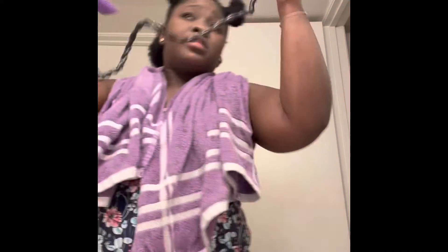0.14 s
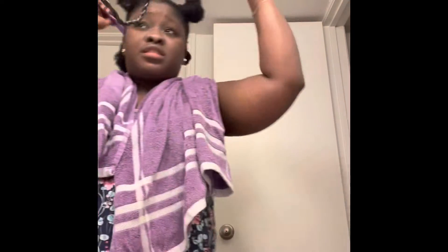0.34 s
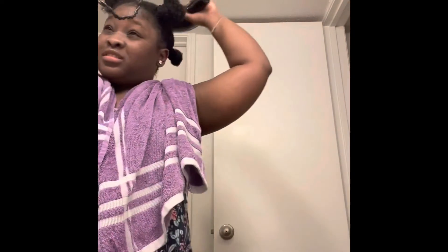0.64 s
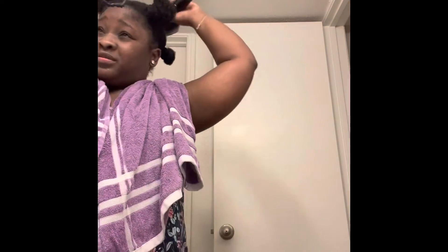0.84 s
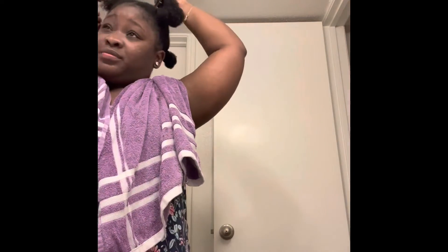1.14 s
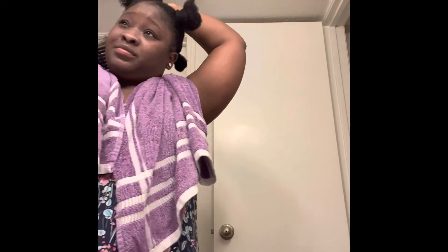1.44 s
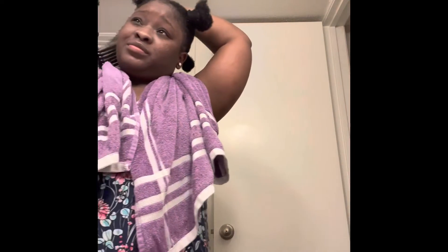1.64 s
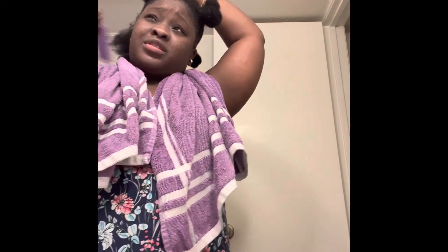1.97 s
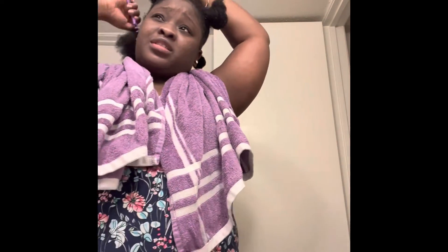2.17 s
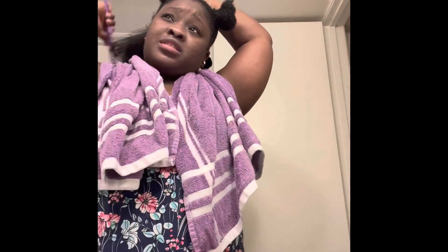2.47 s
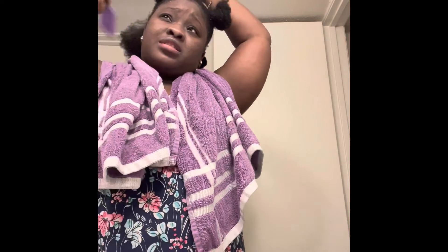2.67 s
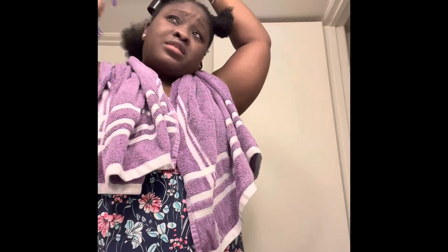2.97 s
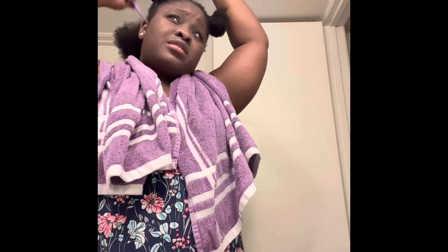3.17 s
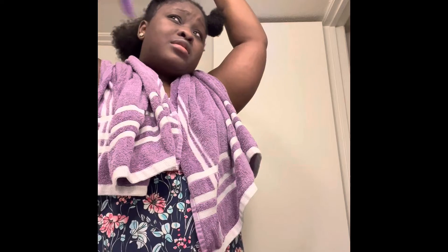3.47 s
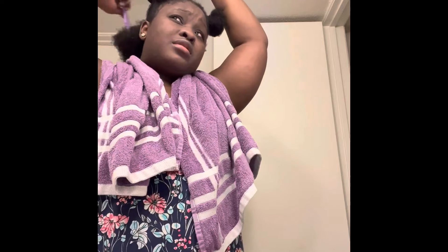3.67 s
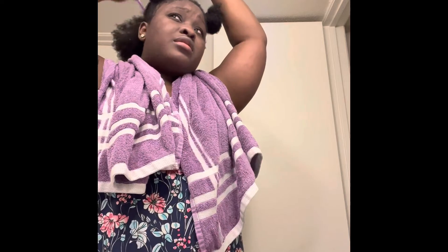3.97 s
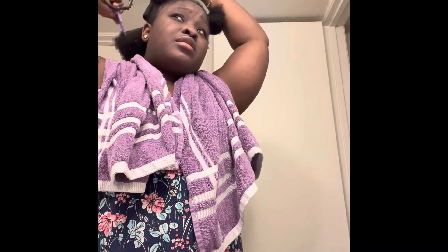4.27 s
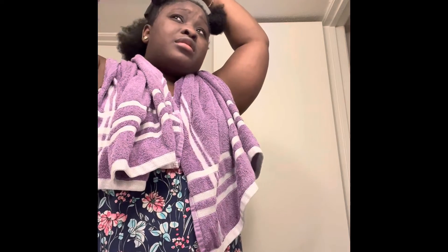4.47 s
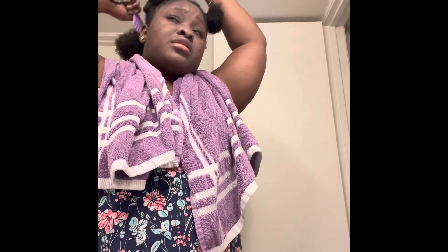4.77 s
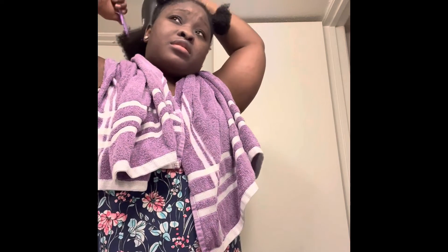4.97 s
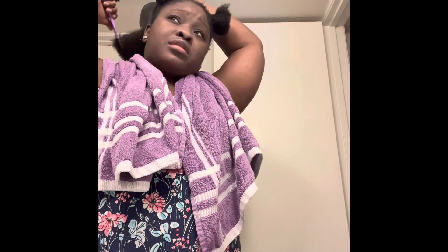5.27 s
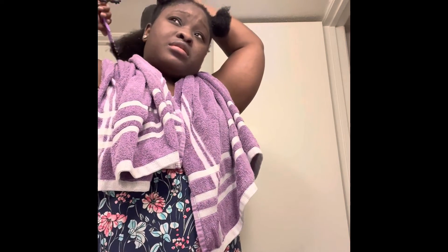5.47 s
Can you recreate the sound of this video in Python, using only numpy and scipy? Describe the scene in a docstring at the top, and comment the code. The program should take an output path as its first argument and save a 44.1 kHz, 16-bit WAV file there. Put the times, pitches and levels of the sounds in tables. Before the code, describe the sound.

Steady noise of a hair dryer indoors, heard close in stereo: broad mid-range rush, softer hiss of air on hair, faint low rumble and motor hum. A whistling whine near 1200 hertz with a higher overtone rides on top, strong at first, returning around one and a half seconds, thinnest near three, then flickering until the end. No switching on or off.

```python
"""A hand-held hair dryer in a small bathroom, heard for 5.6 s by a close two-port microphone.
It opens on a loud blade whine, and in the first second a ring of the shell slides up and back down.
The fan's rush, the housing and the nozzle's hiss on hair, all shaped noise, run on over rumble and motor hum.
The whine, sines on multiples of the shaft speed, swells and drops out in the room's standing waves; the blade
tone dips near 3 s, the low-mid roar lifts briefly at 4.3 s, and a lower duct ring stands out near 4.9 s."""
import sys
import numpy as np
from scipy import signal
from scipy.fft import rfft, irfft, next_fast_len
from scipy.io import wavfile
from scipy.ndimage import uniform_filter1d, map_coordinates

SR = 44100
rng = np.random.default_rng(int(sys.argv[2]) if len(sys.argv) > 2 else 0)


def output_pcm(signal):
    """Save a mono or channel-first signal as 16-bit PCM at the path in sys.argv[1].

    Samples are clipped to [-1, 1] before scaling.
    """
    pcm = np.clip(np.atleast_2d(signal).T, -1, 1) * 32767
    wavfile.write(sys.argv[1], SR, np.round(pcm).astype(np.int16))


N = 247842

# motor speed under the changing load, before a small random drift: (time [s], turns per second [Hz])
SHAFT_SPEED = [(0, 294.4), (.18, 294), (.4, 295), (.65, 294.8), (.87, 296.1), (1.35, 295.25), (1.85, 295.1),
               (2.5, 295.5), (3.5, 295.15), (4.1, 295.2), (4.7, 294.8), (5.0, 295.85), (5.62, 295.8)]
# air flow as the dryer is aimed, before each layer's trim:
# (time [s], jet level [dB], housing level [dB], nozzle hiss level [dB])
AIR_FLOW = [(0, -34, -31, -33.5), (.22, -37, -29.5, -34.5), (.4, -36.5, -31.5, -36.5),
            (.8, -35.5, -33, -39), (1.05, -34, -33, -38.5), (1.45, -37, -35.5, -39.5),
            (2.0, -35.5, -33, -38.5), (2.25, -37.5, -34.5, -39), (2.5, -35.5, -35.5, -39),
            (2.9, -37, -34, -36.5), (3.35, -37, -32.5, -35.5), (3.7, -37.5, -32.5, -36),
            (4.02, -37, -31, -36.5), (4.2, -36, -36, -37), (4.62, -35, -32.5, -36.5),
            (4.88, -35, -34, -36.5), (5.07, -36, -31.5, -37.5), (5.25, -35, -30.5, -37.5),
            (5.62, -35, -31.5, -37.5)]


def amp(db):
    """Decibels to gain."""
    return 10 ** (np.asarray(db) / 20)


def unit(x):
    """Scale to rms 1."""
    return x / np.sqrt(np.mean(x ** 2) + 1e-20)


def along(points, hz):
    """(Hz, value) points read on a log frequency axis."""
    f, v = np.transpose(points)
    return np.interp(np.log(hz + 1), np.log(f + 1), v)


def curves(rows):
    """One value per sample for each column after the time."""
    s, *columns = np.transpose(rows)
    return [np.interp(np.arange(N) / SR, s, column) for column in columns]


def wobble(rate):
    """A smooth random curve through normal random knots, rate knots a second."""
    knots = rng.standard_normal(int(N * rate / SR) + 4)
    return map_coordinates(knots, [np.arange(N) * rate / SR])


def bump(s, half_width):
    """A bell of height 1 centred on time s, down to 1/e at half_width seconds."""
    return np.exp(-((np.arange(N) / SR - s) / half_width) ** 2)


def left_right(hz):
    """Complex gain of left and right at each frequency, mean power 1 over the pair."""
    # left-right balance by frequency: (frequency [Hz], left over right [dB])
    balance = [(170, 0), (400, .7), (530, 6.5), (670, 0), (800, 7), (920, -.5), (1030, 0), (1400, 6),
               (1600, 6), (1840, 10), (2100, 5), (2600, 2.5), (3500, 2), (5000, 0)]
    # left-right phase of the noise by frequency: (frequency [Hz], left minus right [rad])
    phase = [(170, 0), (500, .2), (700, -.5), (830, -2), (950, .3), (1150, -2.6), (1450, 0), (1750, -1.2),
             (2800, -2.4), (4500, -4.3), (6200, -5.05), (8200, -3.4), (10100, -2.95), (11500, -1.5),
             (12700, 0)]
    half = amp(along(balance, hz) / 2) * np.exp(.5j * along(phase, hz))
    pair = np.array([half, 1 / half])
    return pair / np.sqrt(np.mean(abs(pair) ** 2, axis=0))


def rush(gain):
    """Turbulent air of rms 1, coloured by gain(Hz), with left and right noise partly alike."""
    # likeness of left and right noise by frequency: (frequency [Hz], likeness [0-1])
    likeness = [(130, .998), (300, .95), (550, .85), (820, .55), (950, .6), (1100, .3), (1500, .35),
                (1800, .8), (2400, .87), (3200, .15), (4200, .15), (5900, .7), (8400, .96), (10000, .96),
                (11500, .6), (13000, .93)]
    size = next_fast_len(N + SR // 4)
    hz = np.fft.rfftfreq(size, 1 / SR)
    turn = np.arccos(np.clip(along(likeness, hz), 0, 1)) / 2
    shared, apart = rfft(rng.standard_normal((2, size))) * [np.cos(turn), np.sin(turn)]
    spectra = np.array([shared + apart, shared - apart]) * left_right(hz) * gain(hz)
    return unit(irfft(spectra, size)[:, :N])


def colour(spectrum, modes=()):
    """Gain by frequency of a broad spectrum, with resonances and dips added in dB."""
    def gain(hz):
        lift_db = sum(lift / (1 + (2 * (hz - centre) / width) ** 2) for centre, width, lift in modes)
        return amp(along(spectrum, hz) + lift_db)
    return gain


def resonance(centre, half_width):
    """Gain by frequency of one resonance, halved at half_width Hz from its centre."""
    return lambda hz: 1 / (1 + ((hz - centre) / half_width) ** 2)


def standing_waves(x, depth_db, size=2048):
    """Close walls ripple the spectrum by depth_db rms, and the ripple drifts as the hand moves."""
    z = signal.stft(x, nperseg=size)[2]
    ripple = rng.standard_normal(z.shape[1:])
    ripple = uniform_filter1d(ripple, size=3, axis=0)  # across frequency
    ripple = uniform_filter1d(ripple, size=24, axis=1, mode="wrap")  # along time
    ripple = uniform_filter1d(ripple, size=8, axis=1)
    rippled = signal.istft(z * amp(depth_db * unit(ripple)), nperseg=size)[1]
    return unit(rippled[:, :N])


def crossings(order):
    """Gain in dB of one partial as the dryer crosses its nodes and antinodes."""
    # (time [s], multiple of the shaft speed, half width [s], depth [dB])
    node_dips = [(.168, 4, .03, 7), (.56, 4, 0.039, 6), (.79, 4, .018, 7), (.47, 4, .025, 3),
                 (1.84, 4, .04, 6), (2.72, 4, .035, 8), (3.06, 4, .03, 4), (3.365, 4, 0.048, 13),
                 (3.71, 4, 0.075, 8), (4.16, 4, .047, 9), (4.6, 4, .04, 1), (4.82, 4, .05, 5),
                 (.32, 8, .025, 6.5), (.39, 8, .015, 7), (.46, 8, .017, 10), (.62, 8, .03, 11),
                 (.78, 8, 0.037, 10), (.89, 8, 0.013, 7), (1.04, 8, .035, 13), (2.09, 8, .071, 24.5),
                 (2.67, 8, .025, 10), (4.19, 8, 0.031, 6.5), (4.38, 8, .07, 0), (4.79, 8, .025, 12.5),
                 (4.94, 8, 0.023, 11)]
    # (time [s], multiple of the shaft speed, half width [s], lift [dB])
    antinode_swells = [(4.68, 2, 0.043, 10.5), (.125, 8, 0.015, 9.5), (.245, 8, .025, 7.5),
                       (.53, 8, 0.02, 5), (.71, 8, .025, 3), (.95, 8, 0.039, 7.5), (4.71, 8, .045, 3),
                       (.09, 12, 0.049, 8.5), (.29, 12, 0.037, 11), (.45, 12, .041, 6),
                       (.68, 12, 0.039, 11.5), (1.07, 12, 0.12, 9.5), (1.96, 12, .022, 12.5),
                       (2.69, 12, 0.032, 9), (4.35, 12, 0.14, 5), (4.91, 12, .05, 8)]

    def total_db(rows):
        return sum(db * bump(s, width) for s, multiple, width, db in rows if round(multiple) == order)
    return total_db(antinode_swells) - total_db(node_dips)


def blade_tone(angle, level_db, image, order, flutter_db, jitter):
    """One partial at both ports; uneven inflow shakes its strength (dB) and phase (rad)."""
    pan_db, lead = image
    phase = order * angle + jitter * wobble(35)
    left, right = amp(pan_db / 2), amp(-pan_db / 2)
    pair = np.array([left * np.sin(phase + lead / 2), right * np.sin(phase - lead / 2)])
    pair = 2 * pair / np.hypot(left, right)  # rms 1 over both ports
    return amp(level_db + crossings(order) + flutter_db * wobble(25.03)) * pair


def fading_line(angle, order, fade):
    """A shaft multiple of rms 1: a steady direct part plus drifting wall reflections."""
    walls = np.array([wobble(7) + 1j * wobble(6.3) for _ in range(2)])
    mean_hz = np.mean(SHAFT_SPEED, axis=0)[1]
    paths = left_right(order * mean_hz)[:, None] + fade * walls
    return unit(np.real(paths * np.exp(1j * order * angle)))


def room_rumble():
    """Low noise, coloured by the modes of the small room."""
    # (frequency [Hz], relative level [dB])
    rumble_spectrum = [(12, -40), (25, -16), (40, -13), (70, 0), (95, -4.5), (135, -5.5), (200, -8),
                       (310, -10), (380, -9.5), (480, -7.5), (750, -87)]
    # resonances and dips: (frequency [Hz], width [Hz], lift [dB])
    rumble_modes = [(66.5, 3.6, -4.5), (117.7, 11.5, 9.5), (131, 14, -6), (157.3, 11.8, 9.5),
                    (209, 18, -2.5), (258.9, 15.6, 13), (305, 18, -8), (360, 42, 8), (415, 20, -1)]
    # (time [s], level [dB])
    rumble_levels = [(0, -40.5), (.85, -41), (1.1, -42.5), (2.4, -41.5), (3.0, -43.5), (3.45, -41.5),
                     (4.1, -42.5), (4.7, -43), (4.9, -40.3), (5.35, -40), (5.62, -42)]
    level_db, = curves(rumble_levels)
    return amp(level_db + 0.25 * wobble(3.8)) * rush(colour(rumble_spectrum, rumble_modes))


def motor(angle):
    """Imbalance and commutator lines hum and waver under the rush."""
    # hum at twice the shaft speed, before its flutter: (time [s], level [dB])
    hum_levels = [(0, -48), (.22, -45), (.4, -40.5), (1.3, -47), (1.9, -41), (2.2, -45), (2.9, -43.5),
                  (3.4, -51), (3.7, -46.5), (4.4, -44.5), (5.05, -46), (5.25, -38.5), (5.62, -46)]
    # where the ports hear that hum: (left over right [dB], left lead [rad])
    hum_image = (5.2, 0.11)
    # weak lines, before their waver: (multiple of the shaft speed, level [dB])
    motor_lines = [(1, -57.5), (5, -55.5), (6, -50), (7, -49.5), (16, -54.5), (20, -57)]
    hum_db, = curves(hum_levels)
    total = blade_tone(angle, hum_db, hum_image, order=2, flutter_db=2.0, jitter=0.38)
    for multiple, db in motor_lines:
        total = total + amp(db + 2.5 * wobble(14)) * fading_line(angle, order=multiple, fade=0.35)
    return total


def slid(x, shift_hz):
    """Shift every frequency in x by a changing number of Hz."""
    return np.real(signal.hilbert(x) * np.exp(2j * np.pi * np.cumsum(shift_hz) / SR))


def ringing():
    """Turbulence keeps the duct and the shell ringing as two fluttering half-whistles."""
    # (time [s], level [dB])
    duct_levels = [(0, -42), (.2, -36.5), (.5, -44), (1.4, -47), (2.0, -41.5), (2.6, -43.5), (2.8, -42),
                   (3.1, -43.5), (3.6, -44), (4.78, -46.5), (4.9, -35.5), (5.05, -37), (5.4, -40.5),
                   (5.62, -36.5)]
    # (time [s], level [dB])
    shell_levels = [(0, -28.5), (.09, -30), (.2, -36.5), (.36, -43), (1.0, -47), (1.4, -49.5), (2.1, -39.5),
                    (2.3, -34), (2.55, -36.5), (3.2, -34.5), (4.0, -34), (4.2, -41), (4.7, -37.5),
                    (5.0, -43), (5.62, -44)]
    # both slide as the dryer is raised: (time [s], shell shift [Hz], duct shift [Hz])
    ring_slide = [(0, 55, -72), (.09, 138, -72.5), (.14, 389, -82), (.26, 429, -91), (.75, 1, -90.5),
                  (1.6, -1, -0.5)]
    duct_db, = curves(duct_levels)
    shell_db, = curves(shell_levels)
    shell_shift_hz, duct_shift_hz = curves(ring_slide)
    # centres and half widths in Hz, before the slide
    duct = slid(rush(resonance(centre=922, half_width=28)), duct_shift_hz)
    shell = slid(rush(resonance(centre=1822, half_width=80)), shell_shift_hz)
    return amp(duct_db) * duct + amp(shell_db) * shell


def flares():
    """Short swells in which one band rings out of the rush."""
    # (time [s], half length [s], centre [Hz], half width [Hz], level at the crest [dB])
    band_flares = [(.055, .015, 2010, 70, -32), (0.092, .012, 1890, 80, -24), (.16, .08, 2180, 220, -32),
                   (.18, .08, 820, 12, -38), (0.438, 0.038, 2220, 70, -34), (1.01, 0.03, 1830, 53, -36),
                   (1.097, .15, 728, 16, -39), (1.303, .13, 545, 8, -39.5), (2.674, 0.024, 1830, 70, -32),
                   (2.815, 0.017, 1824, 60, -29), (3.645, .02, 1790, 60, -29), (4.02, .03, 1830, 90, -31),
                   (4.673, 0.019, 1830, 65, -27)]
    total = 0
    for s, half_length, hz, half_width, db in band_flares:
        swell = bump(s, half_length)
        burst = unit(swell * rush(resonance(hz, half_width)))
        total = total + amp(db) * np.sqrt(np.mean(swell ** 2)) * burst
    return total


def housing_rush():
    """The housing rings broadly under the air that runs through it."""
    # (frequency [Hz], relative level [dB])
    housing_spectrum = [(900, -28), (1450, -26), (1650, -2), (1800, -1.5), (2000, 0), (2250, -0.5),
                        (2500, -1.5), (2850, -5.5), (3100, -11.5), (4500, -53)]
    # resonances: (frequency [Hz], width [Hz], lift [dB])
    housing_modes = [(1830, 45, 3.9), (2180, 35, 5.6), (2276, 50, 1.1)]
    _, level_db, _ = curves(AIR_FLOW)
    noise = standing_waves(rush(colour(housing_spectrum, housing_modes)), depth_db=3.5)
    return amp(level_db + 0.4 + 0.27 * wobble(24.84)) * noise


def nozzle_hiss():
    """Fine turbulence hisses where the nozzle blows on hair."""
    # (frequency [Hz], relative level [dB])
    hiss_spectrum = [(1500, -30), (2400, -4), (2750, -1), (3030, -2.8), (3350, 1.8), (3750, -1.3),
                     (4150, -1), (4500, -4.3), (5200, -5.6), (6300, -7), (7500, -11.3), (9500, -13.3),
                     (11000, -15.5), (13000, -20.5), (15500, -24)]
    _, _, level_db = curves(AIR_FLOW)
    noise = standing_waves(rush(colour(hiss_spectrum)), depth_db=2.5)
    return amp(level_db + 2 + 0.48 * wobble(22)) * noise


def jet_roar():
    """The jet's turbulence roars in the low mids; the roar lifts once, briefly."""
    # (frequency [Hz], relative level [dB])
    jet_spectrum = [(200, -50), (340, -18.5), (480, -0.5), (620, 0), (850, 0), (1000, -4), (1100, -3),
                    (1300, -5), (1550, -3.5), (2000, -40), (3000, -69)]
    # resonances: (frequency [Hz], width [Hz], lift [dB])
    jet_modes = [(545, 9.2, 8.8), (660, 22, 1.6), (706, 30, 4.7), (784, 14, 3.3), (804, 15, 7.9),
                 (898, 7.6, 3.3), (991, 18, 5.5), (1203, 16, 3.7)]
    # (time [s], half width [s], lift [dB])
    roar_lift = (4.3, 0.021, 3.2)
    level_db, _, _ = curves(AIR_FLOW)
    lift_s, lift_half_width, lift_db = roar_lift
    level_db = level_db + lift_db * bump(lift_s, lift_half_width)
    noise = standing_waves(rush(colour(jet_spectrum, jet_modes)), depth_db=1.44)
    return amp(level_db + 1.0 + 0.5 * wobble(12)) * noise


def whine(angle):
    """Blades passing four to a turn make a tone and two overtones, each with its own standing waves."""
    # levels before flutter, dips and swells: (time [s], level [dB])
    blade_levels = [(0, -23), (.04, -23.5), (.1, -31), (.25, -26), (.33, -34), (.42, -28), (.55, -32),
                    (.7, -29), (.9, -34), (1.0, -36), (1.25, -36.5), (1.4, -28), (1.68, -27.5), (1.85, -31),
                    (2.12, -35.5), (2.3, -29), (2.6, -32), (2.82, -37), (2.95, -46), (3.2, -37.5),
                    (3.55, -38), (4.0, -35.5), (4.4, -37), (4.75, -37.5), (5.05, -31.7), (5.55, -31.5),
                    (5.62, -34)]
    # (time [s], level [dB])
    octave_levels = [(0, -26.5), (.16, -31.5), (.36, -31), (.85, -34.5), (1.12, -35), (1.25, -30),
                     (1.5, -33.5), (1.72, -29.5), (1.95, -28), (2.25, -31), (2.55, -37), (2.87, -29),
                     (3.5, -29), (4.1, -30.5), (4.2, -35), (4.85, -30.5), (5.0, -32), (5.28, -29),
                     (5.55, -32), (5.62, -37)]
    # where the standing waves put each partial: (time [s], left over right [dB], left lead [rad])
    blade_image = [(0, 9, 3), (.14, -3, 3), (.19, 8, 3.5), (.24, 5, 5.5), (.3, 13, 4.5), (.37, -7.5, 9.5),
                   (.46, -2, 10), (.52, 11, 9.5), (.58, -1, 5), (.77, 7, 3.5), (.83, -4, 5), (1.0, 0, 5),
                   (1.4, -1, 4.1), (1.75, 2, 3.6), (1.81, -1, 3.2), (1.87, 0.5, 4), (1.95, 9, 4),
                   (2.1, 9, 3), (2.4, 18, 1.3), (2.66, 16, 1.8), (2.78, 5, -0.8), (2.97, 9, -1.3),
                   (3.15, -1, 0.5), (4.05, 2.5, 0.55), (4.15, 10, 1.2), (4.21, -0.5, 3.5), (4.52, 4, 3),
                   (4.61, 11, 1.5), (4.68, 4, 0.3), (4.76, 8, 1.5), (4.82, -5, 3.5), (4.91, 3, 3.5),
                   (5.01, 7, 1.5), (5.62, 3, 2)]
    # (time [s], left over right [dB], left lead [rad])
    octave_image = [(0, 1.5, -2.5), (.24, 5, -2), (.4, 1, -3), (.55, 4, -2.5), (.8, 3, -2.5), (1.4, 2, -2),
                    (1.9, 9, -2), (2.25, 2, -2.5), (2.85, 5.5, -2), (4.13, 2.5, -2), (4.19, -1, -4),
                    (4.55, 0, -3), (4.72, 1, -2.5), (4.92, -1, -3), (5.02, 4, -1.4)]
    # (time [s], left over right [dB], left lead [rad])
    twelfth_image = [(.7, 0, -0.45), (1.07, -2, -1.2), (1.96, 10.5, -1.6), (2.6, 2, -1.4), (3.7, 2, -0.86),
                     (4.35, -4, -1.8), (4.91, 8, -1.2), (5.62, 2, -1.4)]
    twelfth_db = -49  # resting level of the third harmonic
    blade_db, = curves(blade_levels)
    octave_db, = curves(octave_levels)
    blade = blade_tone(angle, blade_db, curves(blade_image), order=4, flutter_db=1.23, jitter=0.049)
    octave = blade_tone(angle, octave_db, curves(octave_image), order=8, flutter_db=1.5, jitter=0.19)
    twelfth = blade_tone(angle, twelfth_db, curves(twelfth_image), order=12, flutter_db=1.1, jitter=1.15)
    return blade + octave + twelfth


def scene():
    """One shaft drives every tone, inside the rush of air."""
    shaft_hz, = curves(SHAFT_SPEED)
    angle = 2 * np.pi * np.cumsum(shaft_hz + 0.13 * wobble(12)) / SR
    air = room_rumble() + housing_rush() + nozzle_hiss() + jet_roar()
    return air + ringing() + flares() + motor(angle) + whine(angle)


def record(dry):
    """The recorder keeps nothing above its band limit."""
    top_hz = 15750
    size = next_fast_len(N + SR // 4)
    kept = np.fft.rfftfreq(size, 1 / SR) < top_hz
    return irfft(rfft(dry, size) * kept, size)[:, :N]


dry = scene()
out = record(dry)
output_pcm(out)
```